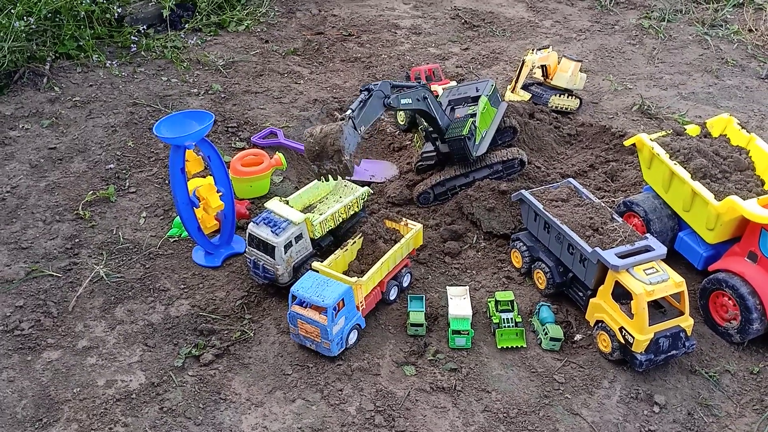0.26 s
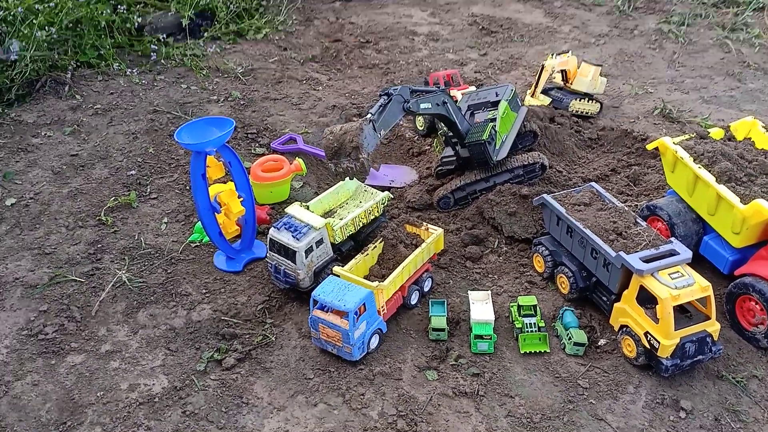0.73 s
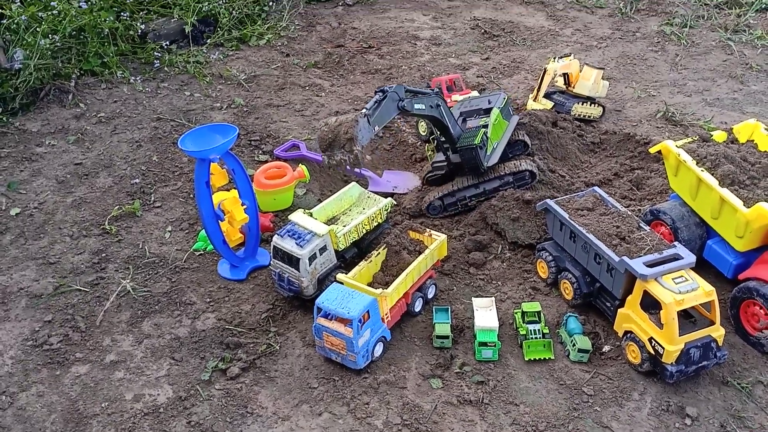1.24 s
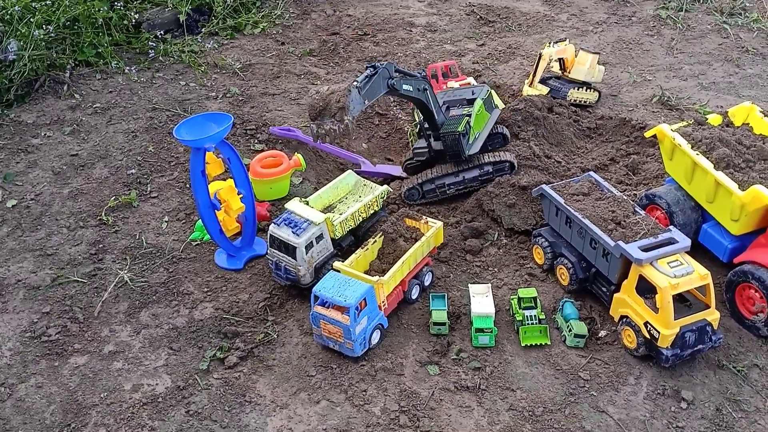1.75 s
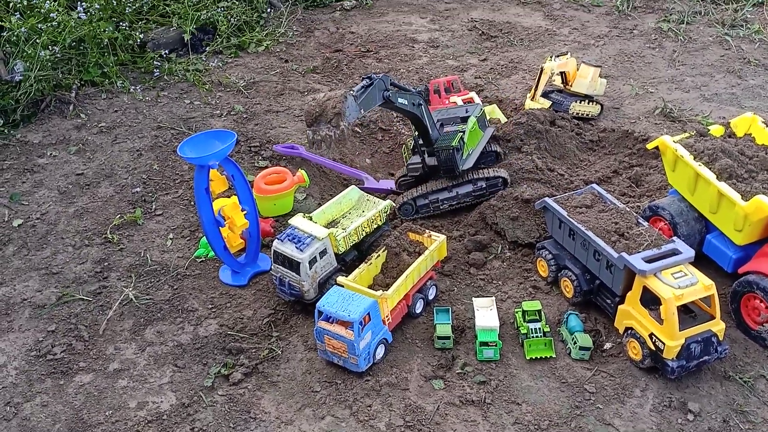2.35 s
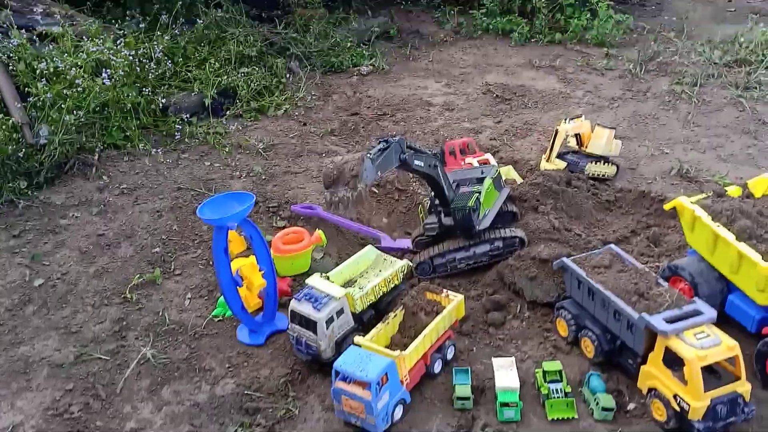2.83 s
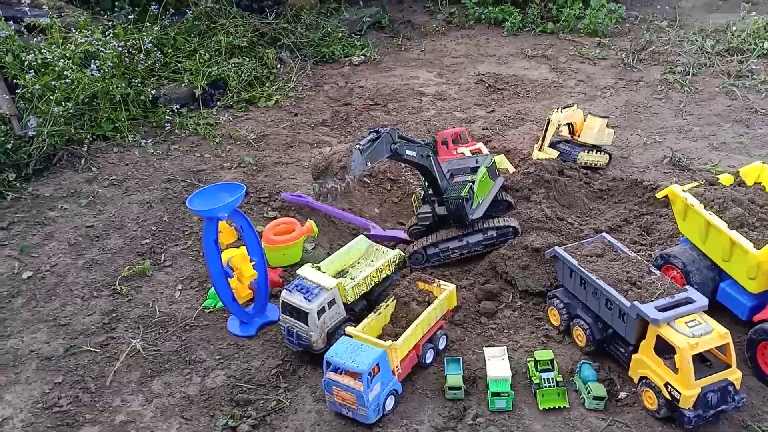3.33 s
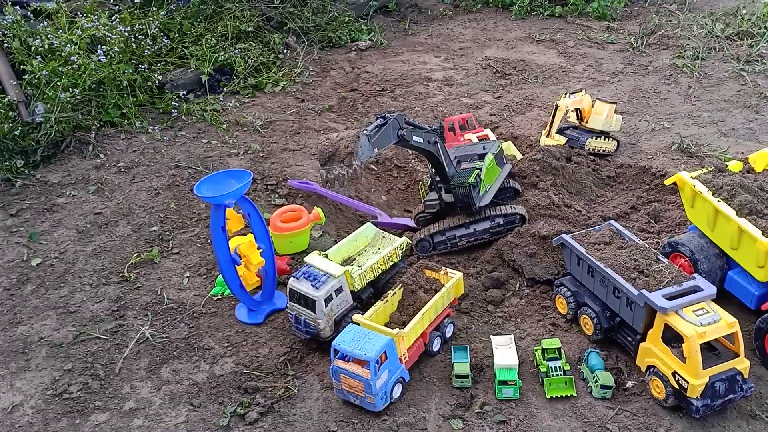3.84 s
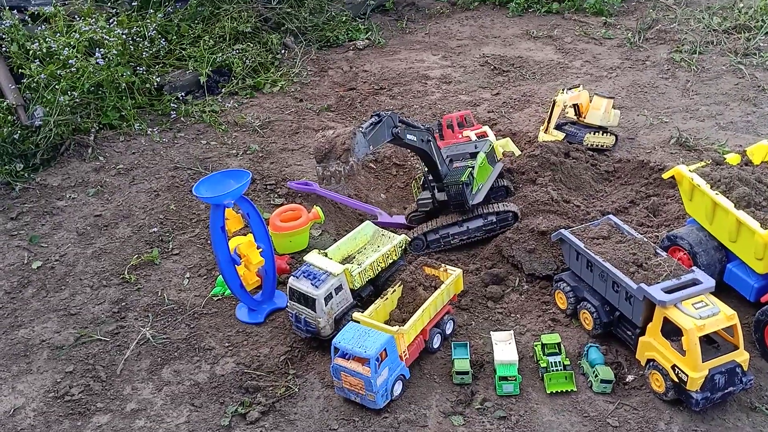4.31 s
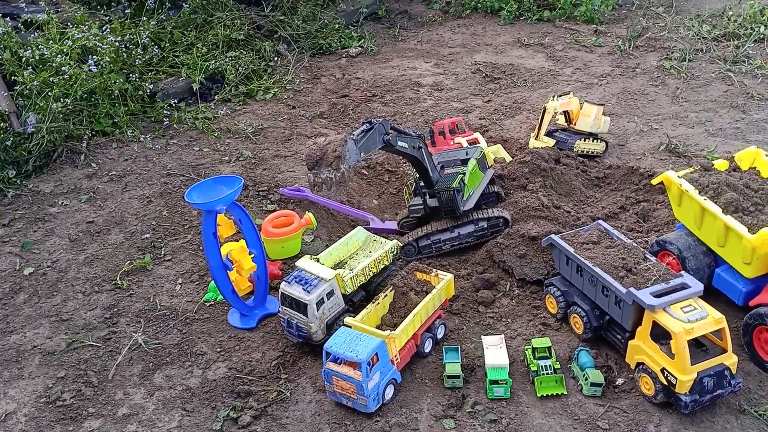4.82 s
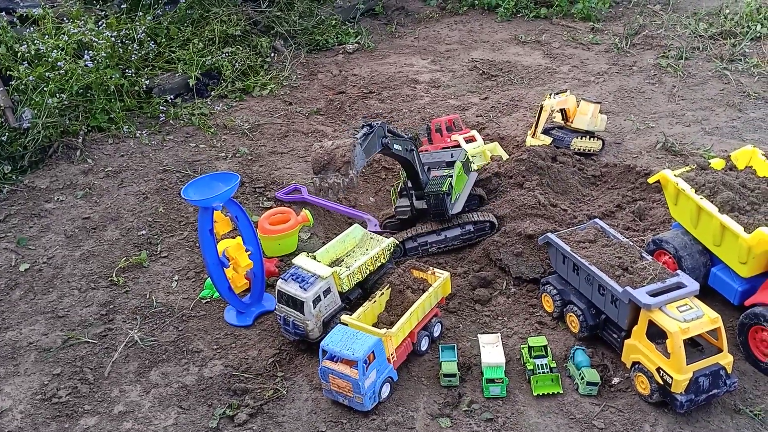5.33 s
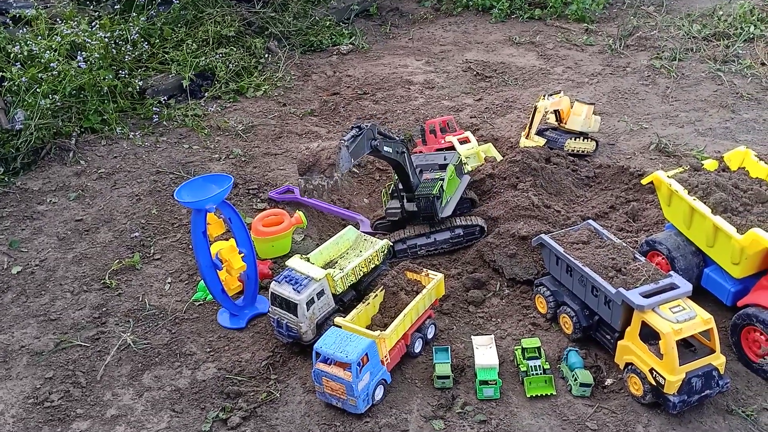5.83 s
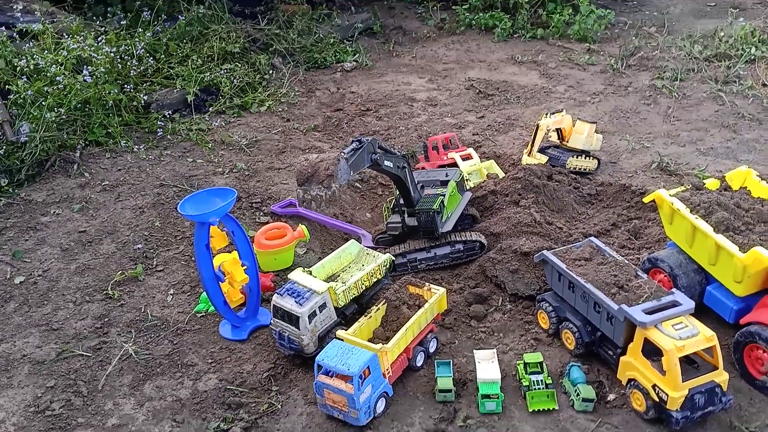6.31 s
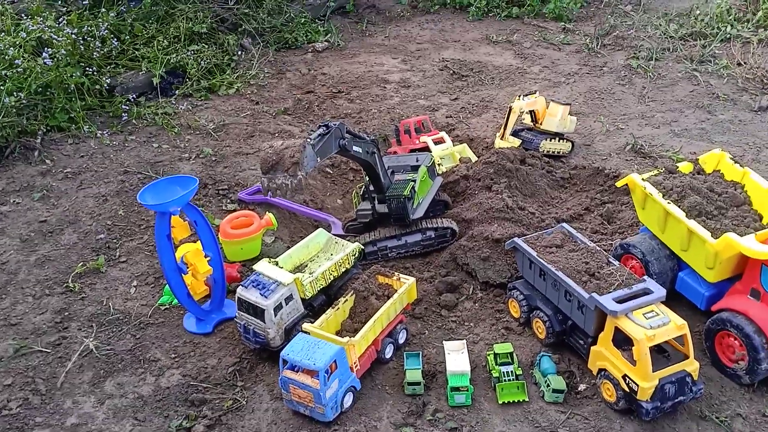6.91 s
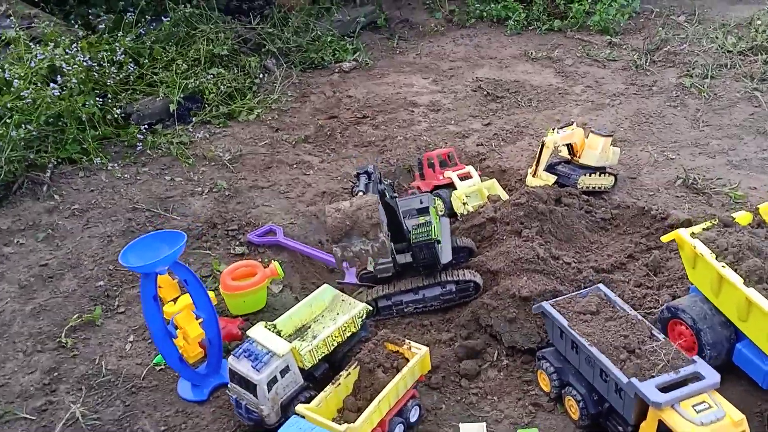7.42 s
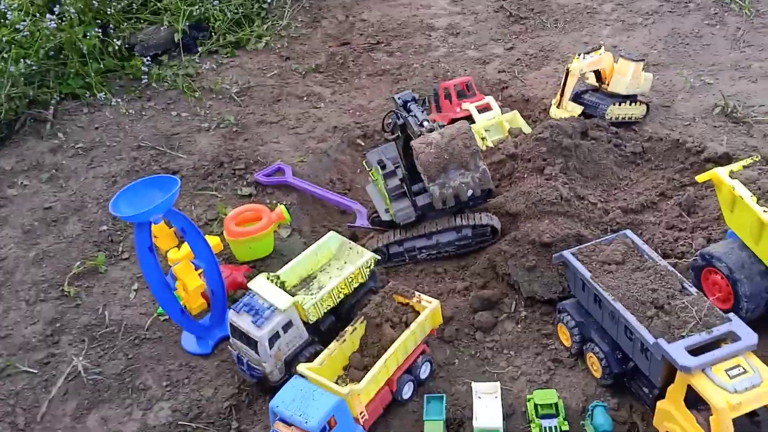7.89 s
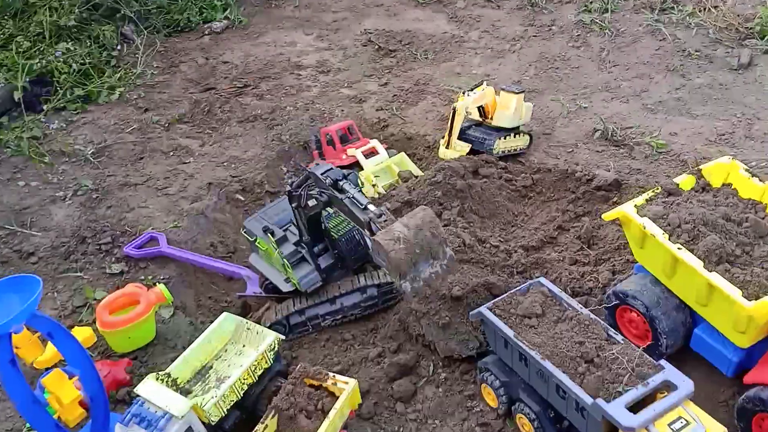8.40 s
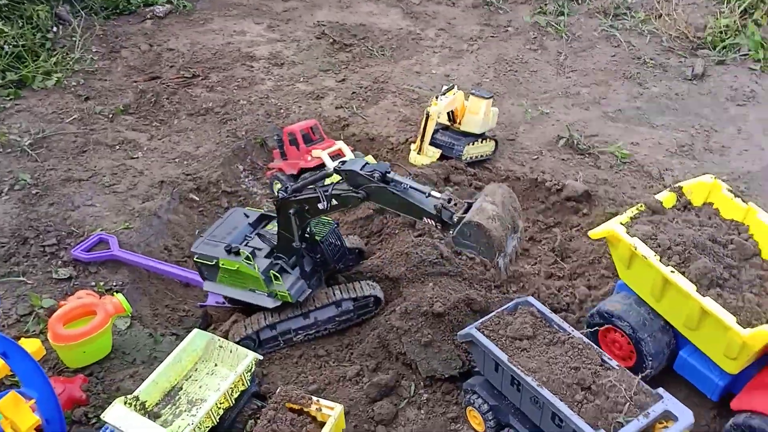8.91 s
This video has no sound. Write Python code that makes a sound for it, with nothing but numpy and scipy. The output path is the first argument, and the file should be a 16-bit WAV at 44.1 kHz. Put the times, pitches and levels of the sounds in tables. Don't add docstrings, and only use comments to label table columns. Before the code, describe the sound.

A battery toy excavator works in garden soil about two metres away. Motors already running coast down, then short whining bursts rise and fall with dry gear rattle. Close at the right, a hollow plastic remote knocks, creaks and clicks. Quiet gaps reveal faint rumble and insects. After a longer pause, a rougher swing motor grinds, joined near the end by a humming boom motor.

```python
import sys
import numpy as np
from scipy import signal
from scipy.fft import rfft, irfft, next_fast_len
from scipy.io import wavfile
from scipy.ndimage import uniform_filter1d

SR = 44100
rng = np.random.default_rng(int(sys.argv[2]) if len(sys.argv) > 2 else 0)


def ratio(d):
    e = np.asarray(d, float) / 20
    return 10 ** e


def int16_out(signal):
    q = np.round(np.clip(np.atleast_2d(signal).T, -1, 1) * 32767)
    wavfile.write(sys.argv[1], SR, q.astype(np.int16))


N = 403515
T = np.arange(N) / SR


def unit(x):
    return x / np.sqrt(np.mean(x ** 2))


def colour(x, points):
    hz, db = np.transpose(points)
    size = next_fast_len(N)
    f = np.arange(size // 2 + 1) * SR / size + 1
    gain = ratio(np.interp(np.log(f), np.log(hz), db))
    return irfft(rfft(x, size) * gain, size)[..., :N]


def band(x, lo_hz, hi_hz):
    return signal.sosfilt(signal.butter(2, [lo_hz, hi_hz], "band", fs=SR, output="sos"), x)


def highpass(x, hz, order):
    return signal.sosfilt(signal.butter(order, hz, "high", fs=SR, output="sos"), x)


def ring(x, hz, t60):
    pole = np.exp(2j * np.pi * hz / SR - np.log(1000) / (t60 * SR))
    return signal.lfilter([1], [1, -pole], x).imag


def walk(rate):
    k = int(SR / rate)
    steps = np.repeat(rng.standard_normal(N // k + 1), k)
    return np.sqrt(2) * uniform_filter1d(uniform_filter1d(steps, k), k)[:N]


def span(s, edge):
    return np.clip(np.minimum(T - s[0] + (s[0] == 0), s[-1] - T) / edge, 0, 1)


def place(x, sides):
    size = next_fast_len(N)
    f = np.arange(size // 2 + 1) * SR / size
    db, turn = (np.interp(f, *np.transpose(table)) for table in sides)
    half = ratio(db / 2) * np.exp(.5j * turn)
    pair = np.array([half, 1 / half])
    return irfft(rfft(x, size) * pair / np.abs(np.mean(pair, axis=0)), size)[:, :N]


def motor(runs, orders, top, wobble, flutter_db, chatter=0):
    out, turns, on = np.zeros(N), np.zeros(N), np.zeros(N)
    shake = 1 + wobble * walk(90)
    flutter, drift = flutter_db * walk(60), 2.5 * walk(9)
    rough = 1 + chatter * walk(400)
    for run in runs:
        s, hz, db, *top_db = np.transpose(run)
        i = slice(int(s[0] * SR), min(int(s[-1] * SR), N))
        t = T[i]
        phase = 2 * np.pi * np.cumsum(np.interp(t, s, hz) * shake[i]) / SR
        fade = span(s, 0.013)[i]
        lines = [(k, g + np.interp(t, s, db)) for k, g in orders]
        lines += [(top, np.interp(t, s, c)) for c in top_db]
        for k, g in lines:
            unsteady = np.roll(flutter + (k != 1) * drift, rng.integers(N))[i]
            line = np.sin(k * phase + 6 * rng.random())
            out[i] += fade * rough[i] * np.sqrt(2) * ratio(g + unsteady) * line
        turns[i], on[i] = phase, fade
    return out, turns, on


# [share of top speed], level in [dB].
DRIVEN_WHINE = [(.3, -20), (.45, -6), (.75, -1), (.92, 5), (1, 0)]
COASTING_WHINE = [(.2, -35), (.36, -22.5), (.48, -7), (.7, -4), (0.999, 2.5)]
# [share of top speed], level against the whine in [dB].
DRIVEN_OCTAVE = [(.45, -26), (.65, -14), (.8, -12), (.9, -9), (1, -11)]
COASTING_OCTAVE = [(.15, -31), (.26, -14), (.4, -9), (.65, -10), (.85, -14), (0.999, -12)]
# [share of top speed], level in [dB].
RATTLE_LAW = [(0, -35.5), (.12, -20), (.4, -6), (.7, -2.5), (1, 0)]


def bursts(rows, spin_s, coast_s, driven_whine=DRIVEN_WHINE, octave_db=0):
    bite_hz, free_hz, load_knee = 702.3, 2780, 20
    friction_hz, overlap_s = 6000, 0.034
    treble_db, treble_per_db = -3, 1
    runs = []
    next_starts = [row[0] for row in rows[1:]] + [N / SR]
    for (s0, off, top_hz, db, rattle_db), after in zip(rows, next_starts):
        stop = off + coast_s * np.log(1 + top_hz / friction_hz)
        t = np.arange(max(s0, 0), min(stop, after + overlap_s), .002)
        free = free_hz - (free_hz - bite_hz) * np.exp(-(np.minimum(t, off) - s0) / spin_s)
        driven = (free ** -load_knee + float(top_hz) ** -load_knee) ** (-1 / load_knee)
        coast = np.exp(-np.maximum(t - off, 0) / coast_s)
        hz = np.maximum((driven + friction_hz) * coast - friction_hz, 1)
        laws = driven_whine, COASTING_WHINE, DRIVEN_OCTAVE, COASTING_OCTAVE, RATTLE_LAW
        up, down, up2, down2, rattle = (np.interp(hz / hz.max(), *np.transpose(law)) for law in laws)
        whine = db + np.where(t < off, up, down)
        octave = db + octave_db + np.where(t < off, up2, down2)
        treble = treble_db + treble_per_db * rattle
        runs.append(np.transpose([t, hz, whine, rattle_db + rattle, treble, octave]))
    return runs


# gears bite in [s], power off in [s],
# loaded tooth rate in [Hz], whine in [dB], rattle in [dB].
ARM_START = [
    (.911, 1.162, 2372, -44, -41.5),
]
ARM_LIFTS = [
    (1.362, 1.638, 2249, -45, -40.5),
    (1.754, 1.96, 2665, -47.5, -39.5),
]
ARM_JABS = [
    (3.153, 3.312, 2325, -49.5, -44.5),
]
ARM_DIP = [
    (3.992, 4.15, 2511, -47, -44.5),
]
ARM_HOLD = [
    (4.805, 5.22, 2170, -56, -44.5),
]
ARM_DROPS = [
    (5.738, 5.998, 2468, -48, -41.5),
]
BUCKET = [
    (4.905, 5.28, 2432, -49, -43.5),
]
# [share of top speed], level in [dB].
START_WHINE = [(.45, -26), (.68, -9), (.78, -1), (.92, 5), (1, 0)]
EASY_WHINE = [(.5, -24), (.7, -8), (.85, 0), (1, 0)]
BUCKET_WHINE = [(.5, -16), (.62, 0), (.72, 6), (.87, 6), (.92, -4), (.96, -6), (1, 0)]
ARM_MULTIPLES = [1 / 9, .272, 5 / 13, 6 / 13, 8 / 13, 10 / 13, 1, 4 / 3, 1.57, 3]
LIFT_LINES_DB = [-16, -23, -19, -22, -13, -18, 0, -13, -14, -17]
FREE_LINES_DB = [-13, -15, -13, -13, -5, -12, 0, -11, -17, -6]
BUCKET_LINES_DB = [-19, -13, -16, -22, -11, -18, 0, -11, -18, -15]
# frequency in [Hz], level in [dB].
ARM_RADIATION = [(190, -20), (245, -14), (270, 0), (310, -24), (430, -8), (520, -7), (660, -11), (850, -10),
                 (1200, -5), (1500, 2), (1750, -2), (2200, 1), (2900, -2), (3250, 3), (3650, -6),
                 (4300, -1), (4800, -2), (7500, -5)]


def arm_and_bucket():
    strained = bursts(ARM_LIFTS, .09, .75, octave_db=-1)
    strained += bursts(ARM_START, .09, .66, START_WHINE, octave_db=-1)
    strained += bursts(ARM_JABS, .07, .43, EASY_WHINE, octave_db=1)
    strained += bursts(ARM_DIP, .051, .6, EASY_WHINE)
    free = bursts(ARM_DROPS, .056, .55, EASY_WHINE, octave_db=3)
    free += bursts(ARM_HOLD, .08, .55, EASY_WHINE, octave_db=5)
    bucket = bursts(BUCKET, .13, .6, BUCKET_WHINE, octave_db=3)

    def whine(runs, lines_db, wobble, chatter):
        runs = [run[:, [0, 1, 2, 5]] for run in runs]
        return motor(runs, list(zip(ARM_MULTIPLES, lines_db)), 2, wobble, 1.6, chatter)

    up = whine(strained, LIFT_LINES_DB, .004, .4)
    down = whine(free, FREE_LINES_DB, .0035, .3)
    tilt = whine(bucket, BUCKET_LINES_DB, .003, .15)
    sound = colour(up[0] + down[0] + tilt[0], ARM_RADIATION)
    return sound, strained + free + bucket, up[1] + down[1], up[2] + down[2]


# time in [s], shaft rate in [Hz], shaft hum in [dB], tooth whine in [dB].
BOOM = [
    [(0.0, 398.6, -57, -72), (0.232, 391.6, -56.5, -68), (0.32, 392, -75, -75), (0.434, 310, -50.5, -75),
     (0.56, 222, -66, -79)],
    [(7.98, 246.1, -58, -74), (8.048, 329, -52, -74), (8.1, 392.5, -56, -58), (8.28, 401.7, -52.5, -56.5),
     (8.542, 394, -53.5, -57.5), (8.588, 394, -61, -60), (8.742, 308.2, -44.5, -77),
     (8.902, 229.7, -60, -79), (8.97, 215.0, -80, -75)],
]
# [multiple], level in [dB].
BOOM_ORDERS = [(1, -0.5), (2, -18), (3, -29)]


def boom():
    return motor(BOOM, BOOM_ORDERS, top=9, wobble=.0015, flutter_db=1.5)[0]


# time in [s], shaft rate in [Hz], shaft hum in [dB], commutator line in [dB].
SWING = [
    [(0.0, 283, -55, -54), (0.17, 280.6, -52.5, -53), (0.24, 277, -51, -52), (0.27, 251, -56, -56),
     (0.33, 200, -72, -56.5), (0.355, 180, -75, -50), (0.375, 172, -80, -60)],
    [(6.97, 249.7, -62, -89), (7.02, 244, -68.5, -86), (7.1, 228.4, -66.5, -90), (7.2, 256.3, -64, -90),
     (7.33, 281.8, -66.5, -90), (7.43, 270.6, -59.5, -90), (7.54, 257.4, -63.5, -90),
     (7.72, 277, -62.5, -90), (7.8, 269, -59, -90), (7.93, 255.3, -60, -90), (8.0, 263, -60, -90),
     (8.1, 272, -58.5, -90)],
]
# [multiple], level in [dB].
SWING_ORDERS = [
    [(1, -2), (3, -7.5), (5, -2)],
    [(1, -4), (2, -8), (3, -9.5), (4, -7)],
]
# time in [s], mesh rate in [Hz], level in [dB].
STAGES = [
    [(7.4, 3040, -65), (7.5, 2900, -62), (7.6, 2900, -69), (7.68, 3010, -63), (7.75, 3060, -62),
     (7.84, 2920, -62)],
    [(7.36, 1470, -69), (7.462, 1554, -64), (7.6, 1570, -68), (7.7, 1644, -61), (7.84, 1660, -74)],
    [(8.3, 1187, -63), (8.45, 1170, -59), (8.65, 1114, -64), (8.85, 1114, -59), (8.92, 1085, -71)],
    [(0, 795, -62), (.1, 810, -59.5), (.2, 780, -62)],
]


def swing():
    out = motor(STAGES, [(1, 0)], top=1, wobble=.005, flutter_db=3.5, chatter=.3)[0]
    for run, orders in zip(SWING, SWING_ORDERS):
        out += motor([run], orders, top=8, wobble=.007, flutter_db=3.0)[0]
    return out


# time in [s], level in [dB], extra treble in [dB].
DRIVES = [
    [(0.0, -43.5, -7.5), (0.49, -44.5, -9), (0.516, -51.5, -4), (0.846, -60, -5.5), (0.905, -70, -8)],
    [(6.92, -48, -19), (6.945, -56.5, -8), (7.04, -55, -0.5), (7.85, -51, -2.5), (8.2, -46, -7),
     (8.65, -48, -11), (8.92, -50.5, -8.5), (9.15, -55.5, -11)],
]
# centre in [Hz], width in [Hz], level in [dB].
HOUSING = [
    [(1500, 82, 4.5), (3100, 1170, 3), (2840, 89, 7.5), (3240, 75, 2.5), (1140, 71, 4.5), (3590, 80, 6.5)],
    [(1100, 96, 1.5), (2000, 92, 4), (2550, 130, 6), (2880, 2030, 6.5)],
]
# frequency in [Hz], density in [dB per Hz].
ARM_BODY = [(180, -91), (300, -24.5), (326, -55), (673, -21), (755, -28), (880, -16.5), (983, -10),
            (2170, -2), (4620, -14.5), (6540, -12), (8230, -25.5), (9710, -50), (13500, -41.5),
            (15400, -47.5)]
SWING_BODY = [(88, -53), (150, -58), (253, -8.5), (313, -13.5), (403, -22), (435, -22.5), (700, -15),
              (1080, -3), (1400, -7), (1750, -11.5), (2000, -11), (3530, -12), (3890, -20.5), (6820, -13.5),
              (8950, -35.5), (15400, -55)]
BOTH_BODY = [(180, -27.5), (300, -8), (520, -18.5), (800, -5.5), (1280, -6), (1390, -4), (2030, -7.5),
             (2280, 0), (4470, -13.5), (6020, -9), (15400, -52.5)]


def gears(runs, teeth, on):
    power, bright = np.full(N, 1e-18), np.zeros(N)
    for s, db, treble_db in map(np.transpose, runs):
        rise, fall = (T - s[0] + (s[0] == 0)) / 0.047, (s[-1] - T) / 0.0035
        part = (ratio(np.interp(T, s, db)) * np.clip(np.minimum(rise, fall), 0, 1)) ** 2
        power += part
        bright += part * np.interp(T, s, treble_db)
    gate = (1 + 0.49 * on * np.cos(teeth)) * (1 + 0.029 * on * np.cos(teeth / 18.0))
    housing = (T > 6.85) + 2 * (T < .9)
    out = []
    for share_db in (-1.6, -7.5):
        hits = rng.standard_normal(N) * ratio(1.5 * walk(500)) * gate
        rung = []
        for box in HOUSING:
            peaks = sum((ratio(g) - 1) * band(hits, hz - w / 2, hz + w / 2) for hz, w, g in box)
            rung.append(hits + peaks)
        bodies = colour(rung[0], ARM_BODY), colour(rung[1], SWING_BODY), colour(hits, BOTH_BODY)
        x = np.choose(housing, [b / np.std(band(b, 600, 4360)) for b in bodies])
        x = x + (ratio(bright / power + 8.0) - 1) * highpass(x, 4500, 2)
        out.append(x * np.sqrt(power) * ratio(share_db))
    return out


# rows of frequency in [Hz], left minus right in [dB];
# then rows of frequency in [Hz], left's phase lead in [radians].
TOY_SIDES = [(60, -5), (110, -10.5), (200, -2.5), (380, -1.5), (700, 0.5), (1290, -1.5), (2380, -4.5),
             (4390, -5), (8100, 7), (15000, 15)], [(0, -0.5), (650, 0.93), (1800, -0.7), (4050, -0.26),
             (5300, -1.1), (6900, .5), (10000, -0.054), (12000, -1.5)]


def excavator():
    whine, runs, teeth, on = arm_and_bucket()
    rattle, ground = gears([run[:, [0, 3, 4]] for run in runs] + DRIVES, teeth, on)
    return place(whine + boom() + swing() + rattle, TOY_SIDES) + ground * np.array([[.8], [-1.2]])


# time in [s], peak in [dB], case mode in [Hz], upper modes in [dB].
KNOCKS = [(0.175, -16, 233, -11), (0.1855, -18.5, 200, -23), (0.2395, -27, 242, 7.5),
          (0.806, -24.5, 235, -3.5), (0.848, -33, 268, -5), (1.051, -37, 200.7, -8.5),
          (1.207, -24, 233, -4), (1.478, -37, 203, -15), (1.668, -25.5, 229.5, -3.5),
          (3.026, -37, 255.5, -1.5), (3.889, -29, 240, -5), (4.076, -32.5, 230.6, -9),
          (4.767, -28.5, 233, -6.5), (5.153, -33, 228, -8), (5.17, -38, 234, -16),
          (5.575, -36.5, 252, -4.5), (7.424, -35.5, 249, -29), (7.853, -25.5, 240, -2.5),
          (7.8746, -18, 200, -9), (8.39, -24, 211, 0), (8.752, -19.5, 233, -11)]
# time in [s], peak in [dB], upper modes in [dB].
TAPS = [(0.47, -40.5, 10.5), (0.586, -40, 0.5), (0.696, -54, 14.5), (0.76, -49, -3), (1.862, -47.5, 4),
        (2.416, -55, -4.5), (2.574, -49, 10), (2.794, -51, -2), (2.99, -44.5, 0), (3.548, -46, -5.5),
        (3.683, -49, -7), (3.845, -61, 7), (3.917, -42, -7), (3.966, -47.5, -3.5), (4.568, -57, 2.5),
        (5.491, -60.5, 13), (5.395, -60, 9.5), (5.915, -53, 10), (6.356, -49.5, -13), (6.472, -53.5, -12.5),
        (6.655, -45.5, -6), (6.681, -43, 3), (7.122, -45.5, -4), (7.26, -45, -5), (7.325, -44, 2),
        (7.379, -46, 5), (7.526, -48, 13), (7.692, -52, 14), (8.295, -41, -4), (8.332, -39, 2),
        (9.036, -50, -15), (9.055, -39.5, -2)]
NOTCHES = [(2.185, -49, -2), (2.204, -51, -1), (2.223, -52, 0.5), (2.242, -54, 3), (2.261, -48.5, -3),
           (2.28, -51.5, 0.5), (2.295, -63, 0), (2.607, -51, 5), (2.626, -57, 9), (2.812, -58, 2),
           (2.837, -50, 3), (2.846, -49, -3), (2.865, -52, 1), (2.879, -46, -2), (2.888, -54, 10.5),
           (2.906, -50, 4), (2.919, -46, 2), (2.936, -49, 1), (2.946, -53, 10)]
# frequency in [Hz], level in [dB], t60 in [s].
UPPER_MODES = [(424, -8, 0.058), (654, -3, 0.055), (740, -2.5, 0.032), (900, 2, 0.022), (1310, -19, 0.028)]
TAP_MODES = [(427, -9.5, 0.032), (651, 1, 0.046), (950, -7.5, 0.031), (1300, -15, .02)]


def knocks():
    out, push, t = np.zeros(N), np.zeros((2, N)), T[:4000]
    light = [(s, db, 249 + 17 * rng.standard_normal(), up) for s, db, up in TAPS + NOTCHES]
    thump = (1 - np.exp(-t / 0.003)) * np.exp(-(t / 0.0094) ** 2)
    for k, (s, db, hz, upper_db) in enumerate(KNOCKS + light):
        i = int(s * SR)
        out[i:i + 4000] += ratio(db - 2.5) * np.sin(2 * np.pi * hz * t) * thump
        shove = (1 + .5 * rng.standard_normal(40)) * np.hanning(40)
        push[int(k >= len(KNOCKS)), i:i + 40] += shove * ratio(db + upper_db - 32.0)
    for p, modes in zip(push, (UPPER_MODES, TAP_MODES)):
        out += sum(ratio(g) * ring(p, hz, t60) for hz, g, t60 in modes)
    return out


# start in [s], loudest in [s], end in [s], level in [dB], upper modes in [dB].
CREAKS = [
    (2.567, 2.581, 2.665, -59.5, 5.5),
    (2.80, 2.897, 2.958, -62, 5.5),
    (3.54, 3.573, 3.62, -57, -15),
    (1.89, 1.95, 2.02, -53.5, -9),
]
# frequency in [Hz], level in [dB], t60 in [s].
CREAK_MODES = [(653, -6, 0.048), (1056, -12, 0.032), (1880, -17, .035), (2700, -11, .02)]


def creaks():
    out = np.zeros(N)
    turns = np.cumsum(70 * ratio(5 * walk(60))) / SR
    slips = np.diff(np.floor(turns), prepend=0) * ratio(2.6 * walk(70))
    slips = np.convolve(slips, np.hanning(60), "same") + 6.7 * slips
    slips = unit(slips) + 1.13 * rng.standard_normal(N) * ratio(3 * walk(120))
    case = unit(ring(unit(slips) + 1.4 * rng.standard_normal(N), 256.7, 0.16))
    upper = slips / np.std(ring(slips, 540, 0.045))
    for *s, db, upper_db in CREAKS:
        inside = span(s, 0.007) * ratio(db + np.interp(T, s, [-11, 0, -11]))
        out += case * inside
        out += sum(ring(upper * inside, hz, t60) * ratio(upper_db + g) for hz, g, t60 in CREAK_MODES)
    return out


# time in [s], pitch in [Hz], level in [dB].
SQUEAK = [(7.385, 236, -73), (7.4, 240, -52), (7.432, 257.2, -37.5), (7.47, 269.5, -43.5), (7.51, 264, -64)]


def squeak():
    return motor([SQUEAK], [(1, 0)], top=1, wobble=.004, flutter_db=1)[0]


# rows of frequency in [Hz], left minus right in [dB];
# then rows of frequency in [Hz], left's phase lead in [radians].
HAND_SIDES = [(60, -7), (110, -1), (200, -9), (380, -16), (700, -27.5), (1290, -12), (2380, -4.5),
              (4390, -3.5), (8100, -8.5), (15000, -4)], [(0, -0.5), (340, -1.5), (700, -3), (1500, 0),
              (3000, 2)]


def remote():
    return place(band(knocks() + creaks() + squeak(), 130, 6000), HAND_SIDES)


# time in [s], peak in [dB], centre in [Hz], brittle top in [dB].
TICKS = [(0.1755, -26.5, 2400, -5), (0.2335, -18, 1170, -7), (0.383, -30.5, 2500, 0), (.76, -51, 1300, -25),
         (2.475, -68, 2600, -12), (4.553, -62, 2400, -16), (3.55, -67, 2400, -20), (2.553, -52.5, 2280, 0),
         (2.5726, -50.5, 2470, -3), (2.6557, -59, 2650, -10), (2.793, -55, 1500, 3),
         (2.836, -57, 1840, -11), (2.907, -45.5, 2140, -13), (2.984, -49, 3140, -3),
         (2.992, -45.5, 2000, -13), (3.024, -47, 1220, -4), (3.7855, -43.5, 2550, -5),
         (3.787, -52, 1100, -33), (3.889, -52, 3880, -3), (3.915, -57, 2110, -26), (4.567, -51, 2760, -11),
         (4.764, -48, 2980, -10), (5.491, -44.5, 3020, -10), (5.492, -51, 1500, -20),
         (5.52, -46, 1340, -15), (5.5727, -37, 1430, -14), (5.575, -36.5, 3000, -16),
         (6.395, -63, 5000, -5), (6.475, -58, 5000, 3), (6.57, -61, 4200, 5), (6.585, -61, 4200, -1),
         (6.6457, -54, 1500, -32), (6.768, -59, 2450, -12), (6.6776, -42, 1180, -35),
         (6.682, -57.5, 2180, -25), (7.003, -40.5, 2500, -19), (7.018, -44, 2280, -20),
         (7.8495, -29.5, 2310, -1.5), (7.8686, -31, 1500, -16), (7.868, -37, 3200, -16),
         (9.055, -40.5, 934, -25)]


def ticks():
    out, t = np.zeros((2, N)), T[:1500]
    for s, db, hz, snap_db in TICKS:
        i = int(s * SR)
        r = rng.standard_normal((2, 1500))
        body = unit(band(band(r[0] + 4.2 * r, hz / 1.6, hz * 1.4), hz / 1.6, hz * 1.38))
        snap = unit(band(band(r, 4700, 7300), 4700, 7300))
        crack = body * np.exp(-t / 0.0056) * (1 - np.exp(-t / 0.00089))
        crack += ratio(snap_db) * snap * np.exp(-t / 0.0023)
        out[:, i:i + 1500] += crack / np.abs(crack).max() * ratio(db + np.array([[-2.0], [2.2]]))
    return out


# time in [s], peak in [dB], panel mode in [Hz], t60 in # [s].
STOPS = [(.2408, -20, 760, 0.034), (7.0035, -47, 940, .03), (7.8506, -23, 1360, 0.016),
         (6.6808, -37.5, 900, 0.018), (6.6476, -49, 1170, 0.048), (9.056, -43, 900, 0.018),
         (7.692, -42, 750, .035), (.2405, -27.5, 560, .03), (2.5, -60, 930, 0.04)]


def end_stops():
    out, t = np.zeros((2, N)), T[:1500]
    for s, db, hz, t60 in STOPS:
        i = int(s * SR)
        tone = np.sin(2 * np.pi * hz * t) * (1 - np.exp(-t / .0005))
        out[:, i:i + 1500] += tone * ratio(db - 60 * t / t60 + np.array([[-3.0], [3.0]]))
    return out


# start in [s], end in [s], centre in [Hz],
# start level in [dB], end level in [dB].
SCRAPES = [(0.438, 0.493, 1500, -57, -41.5), (0.458, 0.489, 5400, -44.5, -41.5),
           (5.515, 5.651, 1170, -56, -70.5), (5.519, 5.598, 800, -62, -66), (5.53, 5.576, 1730, -65, -65),
           (5.514, 5.583, 2620, -66, -63), (5.515, 5.59, 3980, -65, -66), (5.517, 5.59, 6000, -69, -78),
           (5.593, 5.647, 2620, -79, -74), (6.161, 6.488, 2700, -67.5, -85), (6.35, 6.5, 1024, -85, -83),
           (6.592, 6.645, 1150, -71.5, -78), (6.65, 6.72, 1230, -60, -75), (2.835, 2.95, 1880, -78, -79),
           (2.981, 2.992, 1190, -62, -58), (2.981, 3.002, 2970, -64, -60), (5.598, 5.72, 4930, -81, -88),
           (0.444, 0.485, 900, -47, -44)]


def soil():
    out = np.zeros((2, N))
    for s0, s1, hz, db0, db1 in SCRAPES:
        grains = rng.standard_normal((2, N)) * ratio(1.1 * walk(270))
        grains = grains[0] + .7 * grains
        grains = unit(band(band(grains, hz / 1.24, hz * 1.24), hz / 1.24, hz * 1.24))
        out += grains * span([s0, s1], 0.0027) * ratio(np.interp(T, [s0, s1], [db0, db1]))
    return out


# frequency in [Hz], density in [dB per Hz].
GARDEN = [(12, -41.5), (20, -13.5), (106, 0), (273, -16), (332, -25), (426, -14.5), (518, -24.5),
          (981, -26.5), (1260, -29.5), (2390, -29.5), (3900, -39), (6320, -33.5), (7470, -28),
          (8350, -74.5), (15400, -43.5)]
# centre in [Hz], width in [Hz], level in [dB].
INSECTS = [(4730, 470, -81.5), (6320, 590, -73)]


def garden():
    mid, side = colour(rng.standard_normal((2, N)), GARDEN)
    side = highpass(side, 250, 1)
    out = unit(mid + side * np.array([[.8], [-.8]])) * ratio(-69.5 + 0.9 * walk(6.2))
    for hz, w, db in INSECTS:
        hiss = band(rng.standard_normal((2, N)), hz - w, hz + w)
        hiss = unit(band(hiss, hz - w / 2, hz + w / 2))
        out += hiss * ratio(db + 2.2 * walk(2.99) + 1.3 * walk(40))
    return out


def scene():
    return excavator() + remote() + ticks() + end_stops() + soil() + garden()


def low_pass(x):
    return signal.sosfilt(signal.butter(12, 15550, fs=SR, output="sos"), x)


def record(dry):
    mix = highpass(dry, 60, 3)
    return low_pass(mix)


dry = scene()
out = record(dry)
int16_out(out)
```